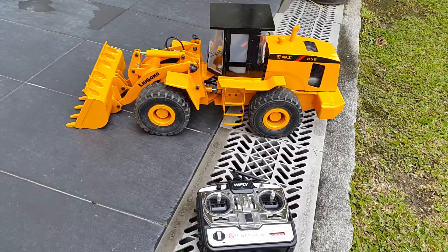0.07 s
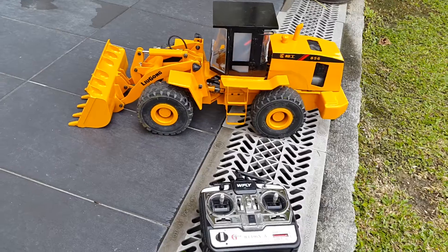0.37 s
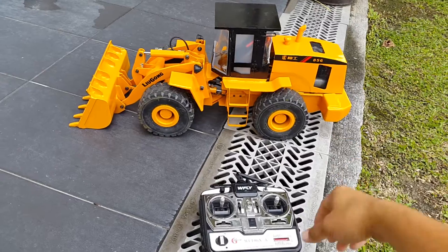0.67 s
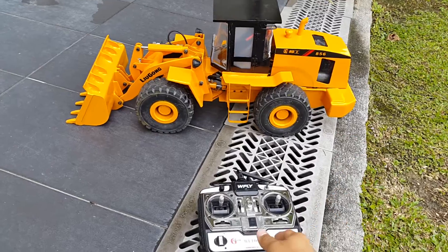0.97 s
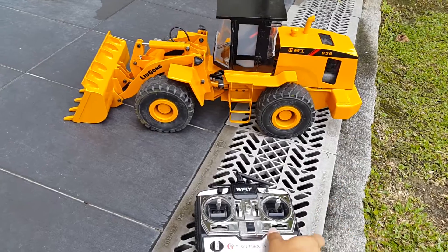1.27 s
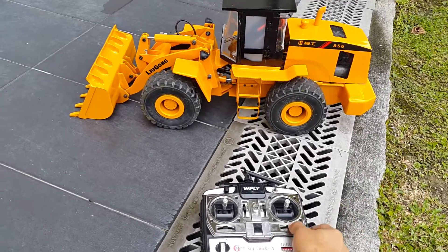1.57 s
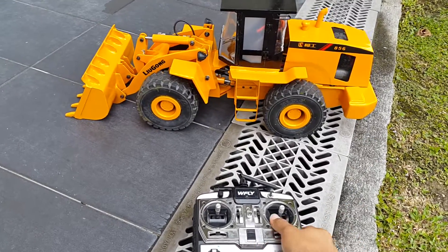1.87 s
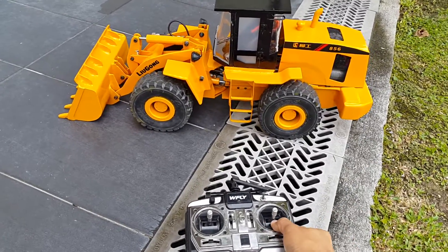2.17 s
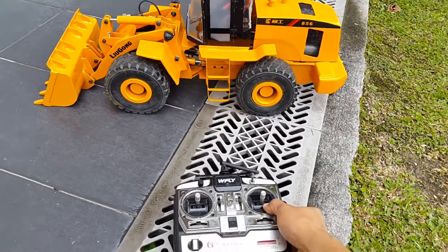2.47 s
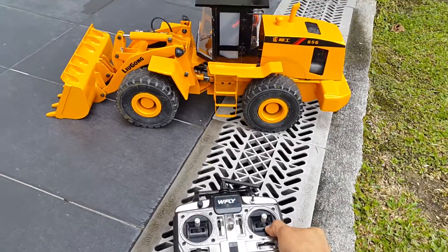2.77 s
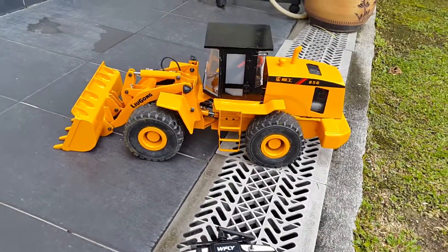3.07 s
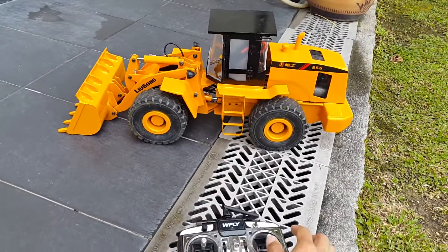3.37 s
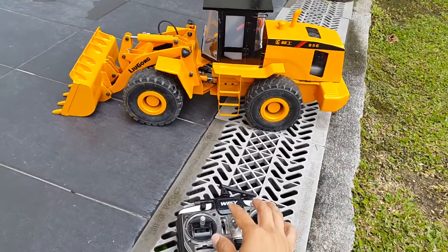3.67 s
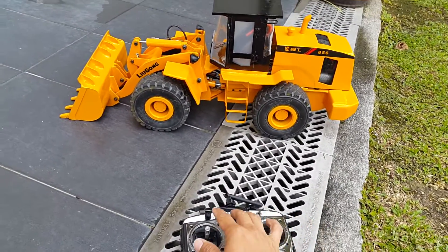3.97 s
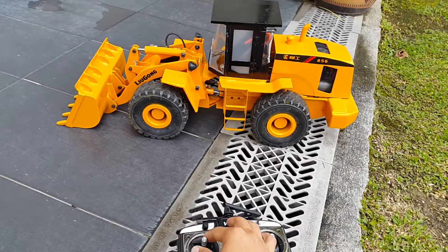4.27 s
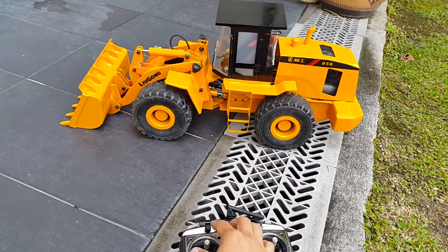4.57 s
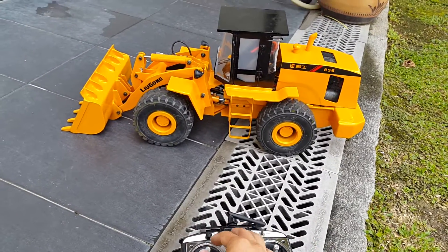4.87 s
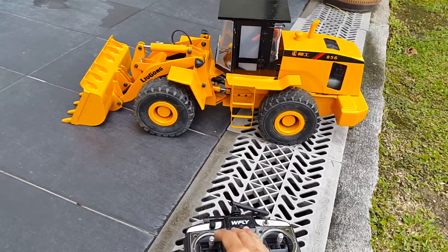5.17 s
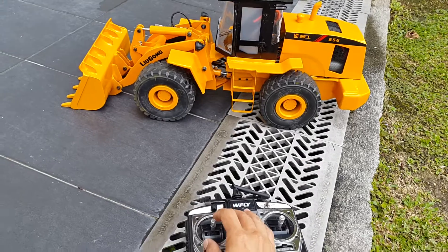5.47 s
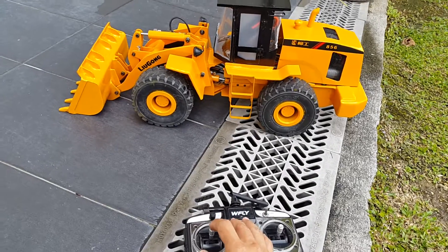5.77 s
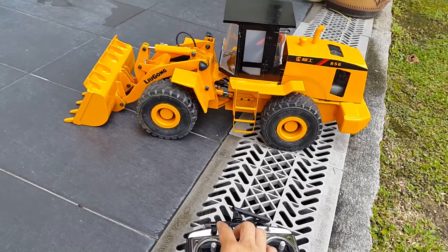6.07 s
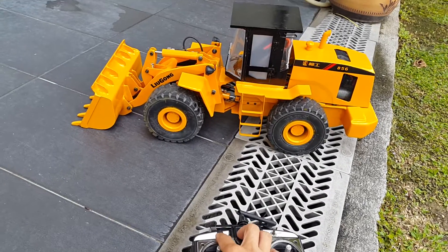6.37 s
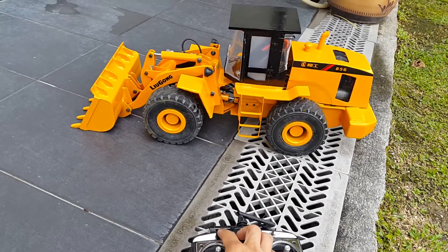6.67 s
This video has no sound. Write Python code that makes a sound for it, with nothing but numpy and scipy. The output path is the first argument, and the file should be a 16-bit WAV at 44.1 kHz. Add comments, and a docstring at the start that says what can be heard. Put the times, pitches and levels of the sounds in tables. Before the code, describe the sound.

A plastic remote control clacks and is nudged on a grate, over faint distant traffic, insects and a far engine drone.

```python
"""A garden patio. A plastic remote transmitter rocks on a drain grate, clacks down and is nudged along:
impacts excite the damped modes of its case and rattle its loose parts, and stick-slip makes it judder.
A far engine drones in harmonics and grows louder as it pulls away. Near the end a second motor joins,
and a far vehicle gives one faint hoot, trailed by a thin squeal. Two low puffs of wind pass. Behind all
this lie a steady machine whine, a band of insects and the broadband noise of distant traffic."""
import sys
import numpy as np
from scipy import signal
from scipy.fft import rfft, irfft
from scipy.io import wavfile

SR = 44100
rng = np.random.default_rng(int(sys.argv[2]) if len(sys.argv) > 2 else 0)


def inscribe(sig):
    """Save sig as 16-bit PCM at rate SR to the path in sys.argv[1].

    A 1-D sig is mono; a 2-D sig holds one channel per row.
    Samples are clipped to [-1, 1] before scaling.
    """
    pcm = np.round(np.clip(np.atleast_2d(sig).T, -1, 1) * 32767)
    wavfile.write(sys.argv[1], SR, pcm.astype(np.int16))


N = 304731
TIME = np.arange(N) / SR
FREQ = np.fft.rfftfreq(N, 1 / SR)

# modes of the transmitter case on the grate: f/Hz, level/dB, T60/s
CASE_MODES = [(198, 0.5, 0.12), (354, -5.5, 0.087), (456, -1, 0.093), (624, -23, 0.053), (730, -19, 0.055),
              (866, -7.5, 0.062), (1029, 1, 0.078), (1227, -4, 0.049), (1241, -4, 0.098),
              (1430, -12.5, 0.064), (1590, -10, 0.15), (1740, -4.5, 0.037), (2170, -6.5, 0.081),
              (2384, -6, 0.046), (2730, -31, 0.091), (3220, -38, .04), (3970, -9.5, 0.039),
              (4706, -15, 0.081), (5110, -10, 0.03), (6670, -18, 0.081), (8800, -35, 0.03)]
# dense rattle of a blow: f/Hz, spectral level/dB
RATTLE_SPECTRUM = [(100, -35), (250, 5.5), (1000, -3), (2200, -1.5), (3200, -10), (5500, -10.5),
                   (8000, -14), (12000, -18.5), (16000, -26)]
# lighter blows: t/s, level/dB, contact band centre/Hz, half width/octaves, relative rattle level/dB
LIGHT_KNOCKS = [(2.3407, -44, 250, 2.1, 4), (2.4516, -36, 2380, 1.25, 10), (2.453, -28.5, 230, 1.2, 3),
                (2.509, -46, 2200, 1.1, 4), (2.5954, -44, 700, 1.8, 1), (2.7583, -50, 13000, 0.53, 5),
                (2.8967, -39.5, 3000, 0.97, 7), (2.899, -38.5, 400, 1.3, 8), (3.097, -44, 2100, .3, 8),
                (3.11, -37, 380, 1.5, 4), (3.158, -39, 600, 1.3, 10), (3.167, -30, 250, 0.76, 7),
                (3.191, -40.5, 650, 2.4, 6), (3.23, -37.5, 2390, 1.13, 4.5), (3.247, -45, 500, 1.9, 12.5),
                (5.4228, -47, 12900, 1.3, 2)]
# judders of the sliding case: t/s, level/dB, duration/s
SLIDE_JUDDERS = [(3.069, -40.5, 0.012), (3.093, -40, 0.035), (3.189, -35.5, 0.018)]
# modes of a small plastic part: f/Hz, level/dB, T60/s
SNAP_MODES = [(1360, -4, 0.047), (2270, 5, 0.013), (2480, -3, .022), (3060, -9, 0.027), (4620, -11, .015),
              (6700, -23, 0.013)]
# reverberation time of the patio: f/Hz, T60/s
PATIO_DECAY = [(150, 0.34), (1000, 0.31), (3000, 0.53), (10000, 0.18)]
# partials of the engine, the second motor and the horn: multiple of the fundamental, relative level/dB
ENGINE_PARTIALS = [(.5, -22.5), (1, -1.5), (2, -13.5)]
MOTOR_PARTIALS = [(2, 1.5), (3, -4)]
HORN_PARTIALS = [(1, 6.5), (4, -18), (5, -15), (6, -11)]
# two soft, low puffs of wind on the microphone: t/s, level/dB, half width/s
WIND_PUFFS = [(4.163, -40.5, 0.056), (4.484, -34, 0.021)]
# insect chorus: f/Hz, spectral level/dB
CHORUS_SPECTRUM = [(4100, -26), (4550, -9.5), (4850, -4), (5100, -4.5), (5300, 0), (5580, -6),
                   (5850, -16.5), (6400, -41)]
# distant traffic: f/Hz, spectral level/dB
TRAFFIC_SPECTRUM = [(20, -37), (32, -33), (49, -15), (90, -9), (126, -7), (160, -6), (254, -7.5),
                    (524, -18), (1390, -21.5), (2700, -28), (4020, -33.5), (6200, -39.5), (10000, -50),
                    (15800, -52)]
# broad humps on that spectrum: f/Hz, width/Hz, gain/dB
TRAFFIC_HUMPS = [(66.5, 36, 3.5), (249, 79, 1.5), (1044, 143, 3.5), (1730, 440, 1), (2090, 153, 3),
                 (3030, 80, 2)]
# likeness of distant noise in the two channels: f/Hz, coherence (0 to 1)
COHERENCE = [(30, 0.75), (60, 0.92), (130, 0.95), (300, 0.95), (600, 0.89), (800, 0.28), (1030, 0.74),
             (1200, 0.69), (1700, 0.15), (3000, 0.28), (4900, 0.36), (6500, 0.22), (9000, 0.061)]
# phase lead of the left channel in distant noise: f/Hz, phase/rad
LEFT_LEAD = [(60, -0.19), (700, -0.5), (1100, 1.32), (1450, -1.9), (1650, -3), (1950, -3), (2200, -0.2),
             (3200, -1.63), (4100, -3), (4800, -4.5), (6200, -4), (8000, -5.5)]
# colour of the left channel against the right: f/Hz, level difference/dB
CHANNEL_BALANCE = [(50, -0.5), (200, -1.5), (420, -2.5), (540, -4.5), (750, -1.5), (1000, 1), (1350, 1),
                   (1900, 3.5), (2700, 3), (3700, 1.5), (5100, -6.5), (6100, 1.5), (7400, 5.5),
                   (15000, 0.5)]


def transmitter(slip_hz=460, snap_s=3.2238, echo_db=-16, cutoff_hz=120):
    """The handled case and its echo; a body small against the wavelength radiates little bass."""
    direct = clack()
    for start, db, centre_hz, octaves, rattle_db in LIGHT_KNOCKS:
        add(direct, start, knock(db, centre_hz, octaves, rattle_db))
    for start, db, length in SLIDE_JUDDERS:
        add(direct, start, judder(db, slip_hz, length))
    add(direct, snap_s, snap())
    direct = signal.sosfilt(signal.butter(2, cutoff_hz, "highpass", fs=SR, output="sos"), direct)
    return direct * pan(1.1) + gain_of(echo_db) * patio_echo(direct)


def clack(start=2.4082, first_gap_s=0.0034, slowing=1.1, contacts=6, decay_db_per_s=520):
    """Impact and chatter: the case lands hard, then meets the bars ever more weakly, at widening gaps."""
    out = np.zeros((2, N))
    add(out, start, knock(db=-18.5, centre_hz=1300, octaves=3.1, rattle_db=-0.9))
    for delay in np.cumsum(first_gap_s * slowing ** np.arange(contacts)):
        chatter = knock(db=-34 - decay_db_per_s * delay, centre_hz=1250, octaves=2.3, rattle_db=12)
        add(out, start + delay, chatter)
    return out


def knock(db, centre_hz, octaves, rattle_db, rise_s=0.0002, tick_hz=7000, tick_db=4, tick_t60=0.015):
    """Impact excitation: a blow ticks, rattles loose parts and rings the modes in its contact band."""
    t = np.arange(SR // 4) / SR
    hz = np.fft.rfftfreq(len(t), 1 / SR)
    ring = 0
    for k, (mode_hz, mode_db, t60) in enumerate(CASE_MODES):
        # neighbouring modes push the air in opposite senses; high ones reach the two sides out of step
        phase = np.pi * k + 0.45 * min(mode_hz / 1000, 3) * rng.standard_normal((2, 1))
        envelope = band(mode_hz, centre_hz, octaves) * gain_of(mode_db - 60 * t / t60)
        ring = ring + envelope * np.sin(2 * np.pi * mode_hz * t + phase)
    noise = rng.standard_normal(len(t)) + 0.61 * rng.standard_normal((2, len(t)))
    grit = unit_rms(irfft(rfft(noise) * gain_of(curve_at(RATTLE_SPECTRUM, hz)), len(t)))
    excited = rfft(grit) * band(hz, centre_hz, octaves)
    rattle_t60 = 0.082 / (1 + centre_hz / 12000)  # small, bright blows die sooner
    lowpass = 1 / (1 + (hz / tick_hz) ** 2)
    rattle = irfft(excited * lowpass, len(t)) * gain_of(rattle_db - 60 * t / rattle_t60)
    tick = irfft(excited * (1 - lowpass), len(t)) * gain_of(rattle_db + tick_db - 60 * t / tick_t60)
    return gain_of(db) * (0.91 * ring + 0.7 * (rattle + tick)) * (1 - np.exp(-t / rise_s))


def judder(db, slip_hz, length, second_harmonic_db=-16, jitter=0.11):
    """Stick-slip friction: a few quick, uneven slips make a short, hollow grunt."""
    t = np.arange(0, length, 1 / SR)
    hz = slip_hz * (1 + jitter * drift(280)[:len(t)])
    phase = 2 * np.pi * np.cumsum(hz) / SR
    slips = np.sin(phase) + gain_of(second_harmonic_db) * np.sin(2 * phase)
    envelope = signal.windows.tukey(len(t), .5) * np.exp(-t / length)
    return gain_of(db) * pan(0) * unit_rms(slips * envelope)


def snap(level_db=-29, rise_s=0.00013):
    """Free vibration: a stiff plastic part snaps into place, and its damped modes give one click."""
    t = np.arange(SR // 10) / SR
    ring = sum(gain_of(db - 60 * t / t60) * np.sin(2 * np.pi * hz * t) for hz, db, t60 in SNAP_MODES)
    return gain_of(level_db) * pan(2.0) * ring * (1 - np.exp(-t / rise_s))


def case_rustle_db():
    """Handling noise: a faint, brief rustle of the case after the clack, as a lift of the noise floor."""
    return 3 * pulse(peak_s=2.54, width_s=0.23)


def patio_echo(direct, build_s=0.0057):
    """Diffuse reverberation: reflections from walls and paving decay at each frequency's own rate."""
    hz, t, spectra = signal.stft(rng.standard_normal((2, SR)), SR, nperseg=256)
    decay = gain_of(-60 * t / curve_at(PATIO_DECAY, hz)[:, None])
    tail = signal.istft(spectra * decay * (1 - np.exp(-t / build_s)), SR, nperseg=256)[1]
    return signal.fftconvolve(direct, tail / np.linalg.norm(tail[0]), axes=1)[:, :N]


def engine(idle_hz=125.04, idle_db=-52.5, pull_s=3.3, rise_s=0.3, hz_per_s=1.1, db_per_hz=0.5):
    """Engine orders follow shaft speed: a far engine idles, then throbs under load and speeds up."""
    load = ramp(pull_s, rise_s)
    gained_hz = hz_per_s * np.maximum(TIME - pull_s, 0)
    throb_db = 1.6 * np.cos(2 * np.pi * 1.43 * (TIME - pull_s - rise_s))
    in_open = ramp(5.56, 0.85)  # it comes into the open and is heard more directly
    load_db = load * (6 + throb_db * (1 - in_open))
    level_db = idle_db + load_db + db_per_hz * gained_hz + 5.5 * in_open
    return vehicle(idle_hz + gained_hz, level_db, ENGINE_PARTIALS, wobble=0.0094, waver_db=1.5, side_db=0.1)


def motor(hz=206.3, level_db=-58.5):
    """Steady rotation gives steady harmonics: a second, higher drone swells in and stays."""
    drone = vehicle(hz, level_db, MOTOR_PARTIALS, wobble=0.0032, waver_db=2.5, side_db=5.0)
    return drone * ramp(5.78, 0.46)


def hoot(hz=414, level_db=-52):
    """Periodic vibration: a far vehicle's horn holds one short harmonic note."""
    horn = vehicle(hz, level_db, HORN_PARTIALS, wobble=0.0023, waver_db=1.5, side_db=4.5)
    return horn * note(start=6.125, length=0.19, attack=0.08, release=0.047)


def vehicle(hz, level_db, partials, wobble, waver_db, side_db):
    """Multipath fading: the partials of a far source share one pitch, but each wavers by its own path."""
    hz = hz * (1 + wobble * drift(15.3))
    return sum(tone(multiple * hz, side_db, lead_rad=-0.22) * gain_of(level_db + db + waver_db * drift(14))
               for multiple, db in partials)


def squeal(hz=2105, level_db=-59.5, waver_db=3.0, wander_hz=5):
    """Random modulation of one high tone: the horn's fifth partial lingers on, faint and wavering, after the
    hoot."""
    envelope = note(start=6.22, length=0.19, attack=0.13, release=0.06)
    gain = gain_of(level_db + waver_db * drift(15))
    return envelope * gain * tone(hz + wander_hz * drift(18), side_db=0, lead_rad=-0.7)


def wind_puffs(centre_hz=115, octaves=0.43):
    """Turbulent pressure: two soft puffs of wind on the microphone give low noise, leaning left."""
    swells = sum(gain_of(db) * pulse(peak_s, width_s) for peak_s, db, width_s in WIND_PUFFS)
    low_noise = irfft(rfft(rng.standard_normal(N)) * band(FREQ, centre_hz, octaves), N)
    return pan(3) * swells * unit_rms(low_noise)


def whine(hz=1367.5, level_db=-60, wander_hz=1.7, waver_db=0.5):
    """Atmospheric fluctuation: a thin machine tone wavers on its way through the air."""
    machine = tone(hz + wander_hz * drift(7.6), side_db=-3, lead_rad=-1.1)
    return machine * gain_of(level_db + waver_db * drift(21))


def insect_chorus(level_db=-62.5, crest_s=2.16, period_s=3.4, shimmer_db=1.1):
    """Incoherent summation: many far insects merge into a noise band that builds and swells in waves."""
    wave_db = 1.1 * np.cos(2 * np.pi * (TIME - crest_s) / period_s)
    build_db = -5 * (1 - ramp(0, crest_s))
    chorus = distant_noise(curve_at(CHORUS_SPECTRUM, FREQ))
    return chorus * gain_of(level_db + wave_db + build_db + shimmer_db * drift(41)) * pan(-6)


def near_insect(hz=5070, level_db=-66, peak_s=3.7, hz_per_db=-3, wander_hz=11, waver_db=2.5):
    """Coupled pitch and level: one insect's thin note sinks as it gets louder and rises as it fades."""
    effort_db = np.minimum(3.0 * (TIME - peak_s), 2.5 * (peak_s - TIME))
    pitch_hz = hz + hz_per_db * effort_db + wander_hz * drift(25)
    song = tone(pitch_hz, side_db=-6, lead_rad=1.7)
    return song * gain_of(level_db + effort_db + waver_db * drift(12))


def traffic(level_db=-44.5, split_hz=380, build_s=3.2, hiss_follow=0.27):
    """Far roads sum to broadband noise: a slowly building rumble under tyre hiss that partly follows it."""
    humps_db = sum(db * np.exp(-2 * ((FREQ - hz) / width) ** 2) for hz, width, db in TRAFFIC_HUMPS)
    roads = gain_of(level_db) * distant_noise(curve_at(TRAFFIC_SPECTRUM, FREQ) + humps_db)
    rumble = irfft(rfft(roads) / (1 + (FREQ / split_hz) ** 4), N)
    hiss = roads - rumble
    build_db = -3.07 * (1 - ramp(0, build_s))
    rumble_db = 1.07 + build_db - 0.23 * drift(6.5)
    hiss_db = 0.7 + hiss_follow * build_db + 0.5 * drift(31)
    return rumble * gain_of(rumble_db) + hiss * gain_of(hiss_db + case_rustle_db())


def distant_noise(spectrum_db):
    """Partial coherence: far noise reaches the two channels partly alike and shifted in phase."""
    left, independent = rfft(rng.standard_normal((2, N)))
    coherence = np.clip(curve_at(COHERENCE, FREQ), 0, 1)
    right = coherence * left + np.sqrt(1 - coherence ** 2) * independent
    right *= np.exp(-1j * curve_at(LEFT_LEAD, FREQ))
    return unit_rms(irfft(np.array([left, right]) * gain_of(spectrum_db), N))


def tone(hz, side_db, lead_rad):
    """Phase is the integral of frequency: a stereo sine on a pitch curve, of rms 1 before panning."""
    phase = 2 * np.pi * (np.cumsum(hz) / SR + rng.random())
    return np.sqrt(2) * pan(side_db) * np.sin([phase + lead_rad, phase])


def drift(hz):
    """Random fluctuation of rms 1, band-limited to about hz."""
    lowpass = np.exp(-(FREQ / hz) ** 2) * (FREQ > 0)
    return unit_rms(irfft(rfft(rng.standard_normal(N)) * lowpass, N))


def band(hz, centre_hz, octaves):
    """Gaussian passband on a log-frequency axis."""
    return np.exp(-.5 * (np.log2((hz + 1) / centre_hz) / octaves) ** 2)


def curve_at(points, hz):
    """Interpolation on a log-frequency axis."""
    f, value = np.transpose(points)
    return np.interp(np.log(hz + 1), np.log(f + 1), value)


def ramp(start, length):
    """Linear rise from 0 to 1, then a hold."""
    return np.clip((TIME - start) / length, 0, 1)


def note(start, length, attack, release):
    """Trapezoidal envelope: attack, hold, release."""
    return ramp(start, attack) * (1 - ramp(start + length, release))


def pulse(peak_s, width_s):
    """Gaussian envelope of height 1."""
    return np.exp(-((TIME - peak_s) / width_s) ** 2)


def gain_of(db):
    """Amplitude ratio of a level in decibels."""
    return 10 ** (np.asarray(db) / 20)


def unit_rms(x):
    """Normalisation to rms 1."""
    return x / np.sqrt(np.mean(x ** 2) + 1e-20)


def pan(side_db):
    """Channel gains for a level difference, left minus right."""
    return gain_of(np.array([[.5], [-.5]]) * side_db)


def add(mix, start, sound):
    """Superposes a stereo sound on the mix from a start time in seconds."""
    part = mix[:, round(start * SR):][:, :sound.shape[1]]
    part += sound[:, :part.shape[1]]


def scene():
    """Linear superposition of the background, the far vehicles, the wind and the handling close by."""
    background = traffic() + insect_chorus() + near_insect() + whine()
    vehicles = engine() + hoot() + squeal() + motor()
    return background + vehicles + wind_puffs() + transmitter()


def record(dry, silent_s=0.41, fade_s=0.35, edge_hz=15850):
    """Linear filtering and gain: each channel's own colour, a fade-in from silence, then a band limit."""
    coloured = irfft(rfft(dry) * pan(curve_at(CHANNEL_BALANCE, FREQ)), N)
    faded = coloured * ramp(silent_s, fade_s)
    lowpass = signal.firwin(511, edge_hz, window=("kaiser", 9), fs=SR)
    return signal.oaconvolve(faded, lowpass[None], "same")


dry = scene()
out = record(dry)
inscribe(out)
```